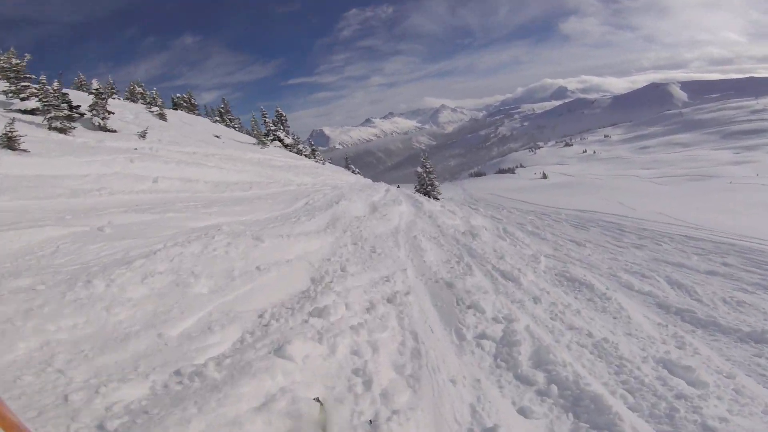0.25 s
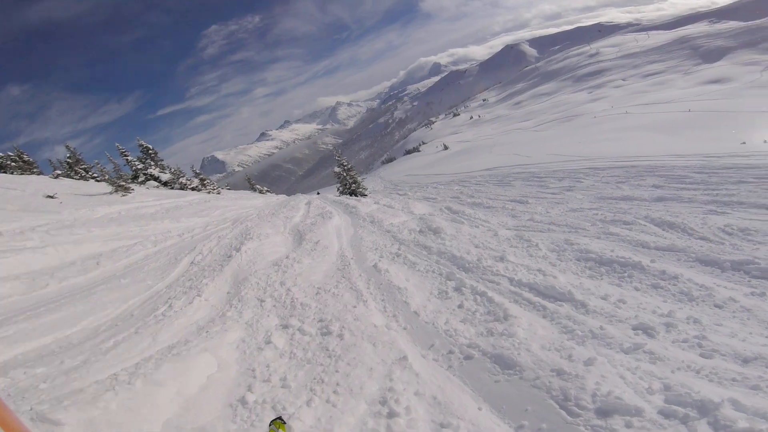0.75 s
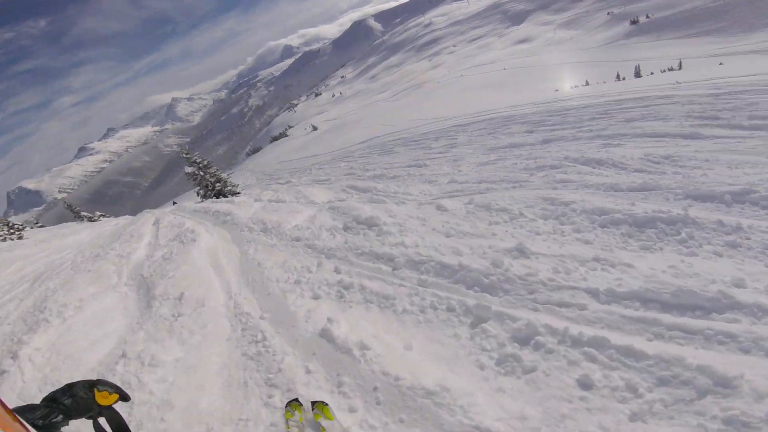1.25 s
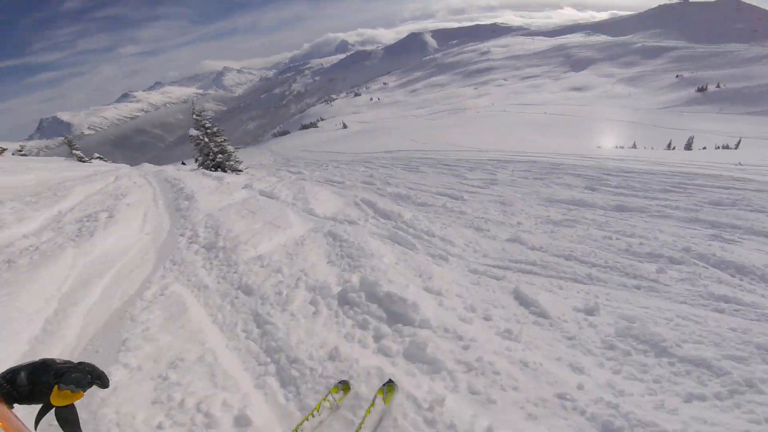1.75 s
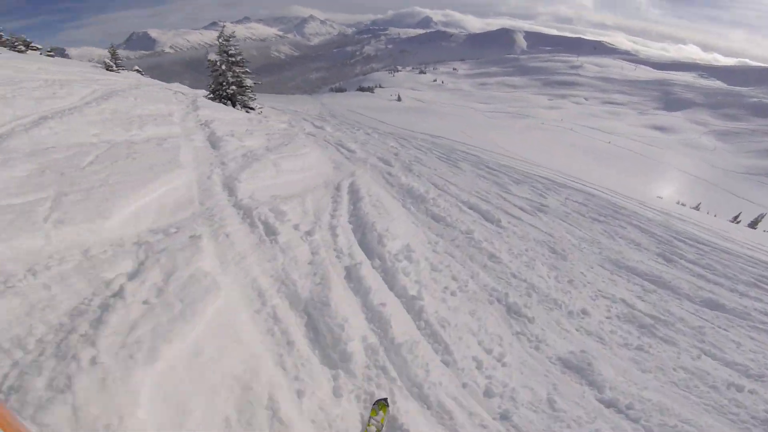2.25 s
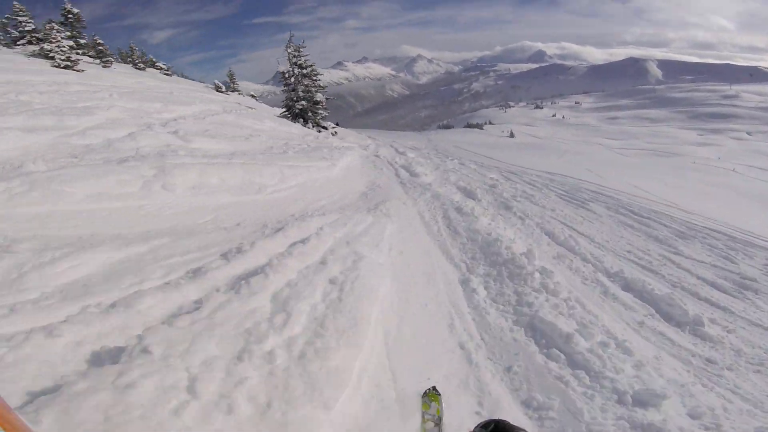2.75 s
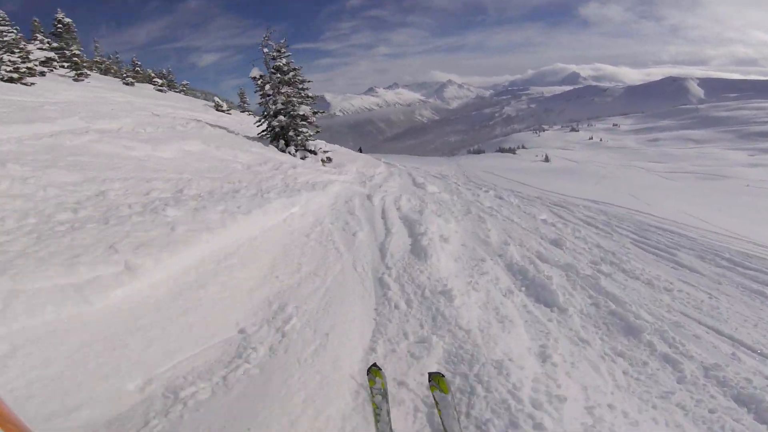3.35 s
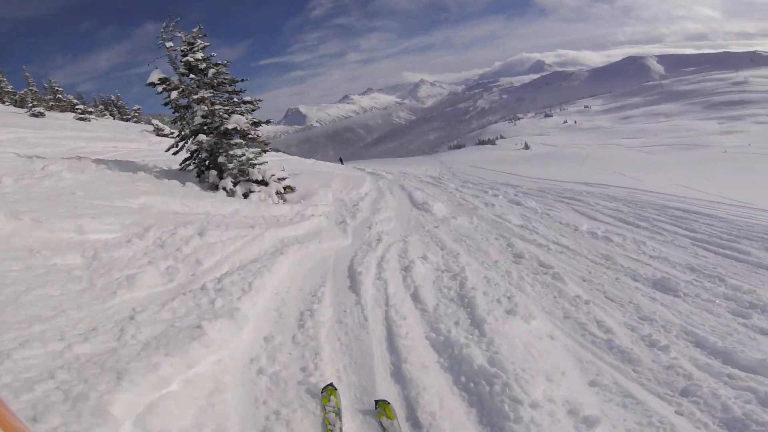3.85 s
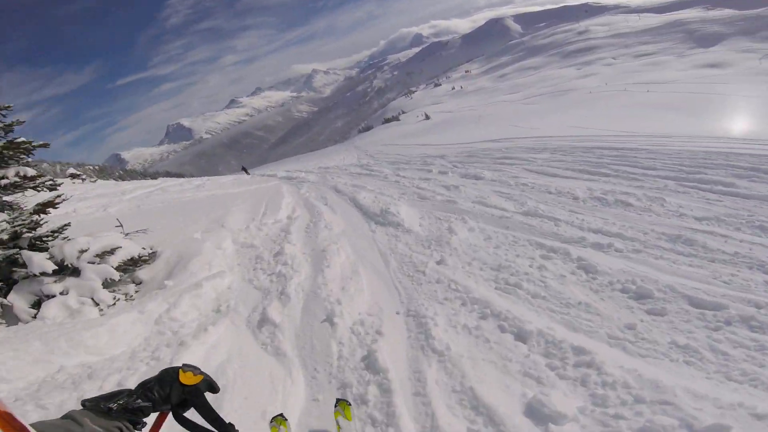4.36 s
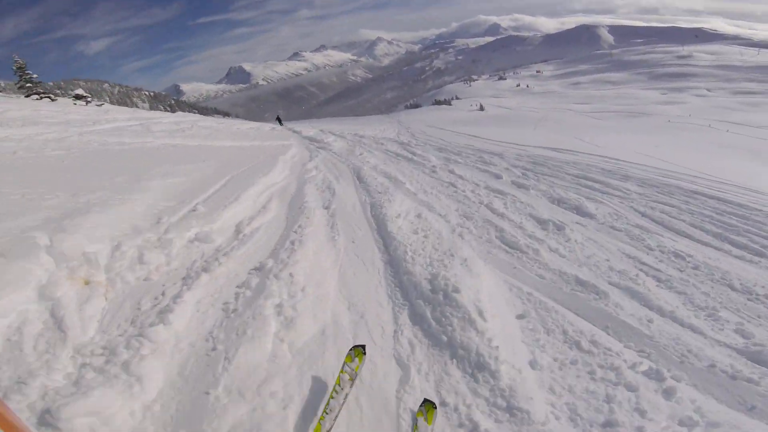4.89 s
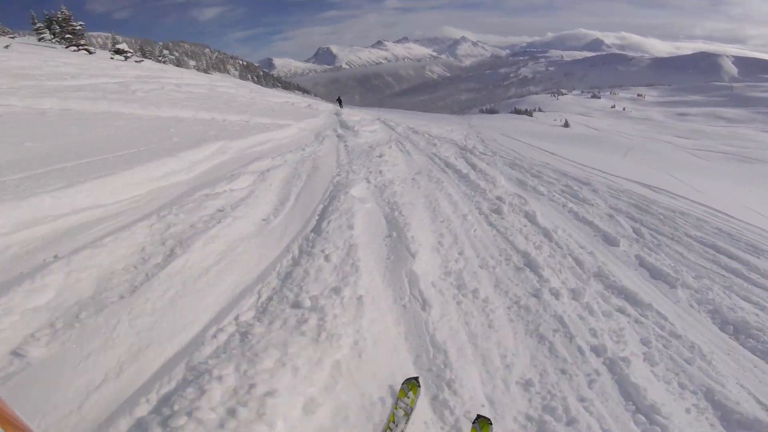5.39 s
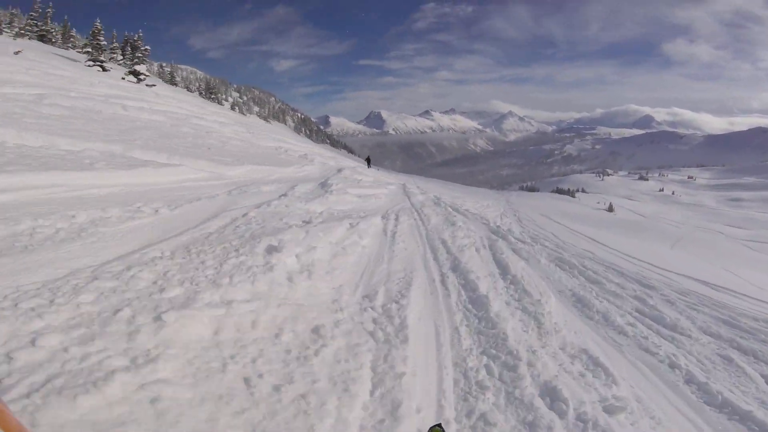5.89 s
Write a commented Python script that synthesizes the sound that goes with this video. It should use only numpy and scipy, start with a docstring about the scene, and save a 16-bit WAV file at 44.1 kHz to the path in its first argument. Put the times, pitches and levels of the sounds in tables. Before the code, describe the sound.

Low, gusty wind buffets the microphone of a camera worn by a skier on an open mountain slope. It starts light and grows with speed, fluttering and thumping unevenly. Underneath, the skis hiss through chopped powder, swelling into a soft, crunchy roar with each skid. A few faint gear squeaks and small ticks of snow come through. The wind is strongest near the end.

```python
"""Low, gusty wind thumps on a body-worn camera over the hiss of a skier gathering speed in powder.
Swirls of air buffet the microphone and break into a finer rush, all growing with airspeed.
The skis hiss and plough through the chopped snow, louder in each skid; the camera's housing
colours the hiss. The gear squeaks now and then, and bits of snow tick against it."""
import sys
import numpy as np
from scipy import signal
from scipy.fft import rfft, irfft
from scipy.io import wavfile
from scipy.ndimage import uniform_filter1d

SR = 44100
rng = np.random.default_rng(int(sys.argv[2]) if len(sys.argv) > 2 else 0)


def log_audio(samples):
    """Write samples as a 16-bit WAV file to the path given in sys.argv[1]."""
    # one column per channel
    frames = np.atleast_2d(samples).T
    # limit to full scale, then quantise
    limited = np.clip(frames, -1, 1)
    pcm = np.round(limited * 32767).astype(np.int16)
    wavfile.write(sys.argv[1], SR, pcm)


N = 270333
T = np.arange(N) / SR

# How strong each noise is from bass to treble: frequency_hz, level_db
BACKGROUND_COLOUR = [(100, 10), (700, 10), (2000, 3), (4000, -10), (8000, -3.5), (11000, -9.5), (13000, -8),
                     (15000, -32)]
SNOW_HISS_COLOUR = [(400, 1), (1200, -6.5), (2000, -0.5), (2900, -3), (4100, -9.5), (5500, -3.5),
                    (7500, 0.5), (9500, -5.5), (10800, -20), (13000, -28), (15000, -38)]
SNOW_ROAR_COLOUR = [(150, -3), (350, 4.5), (550, 2), (850, -2), (1400, -10), (2100, -18.5), (3000, -24.5),
                    (4200, -34), (9000, -80)]
WIND_BUFFET_COLOUR = [(10, -29), (22, 5.5), (38, 6.5), (60, 8), (95, 1.5), (135, -8.5), (200, -23.5),
                      (400, -45)]
WIND_FLUTTER_COLOUR = [(60, -46), (100, 1.5), (135, -1), (200, -7), (300, -13.5), (450, -23.5), (800, -40),
                       (2000, -72.5)]
WIND_RUSH_COLOUR = [(150, -8), (350, 4.5), (550, 2), (850, -6), (1400, -12.5), (2100, -19.5), (3000, -22),
                    (4200, -27.5), (9000, -78)]
# Where the air in the camera's housing rings: pitch_hz, width_hz, boost_db
HOUSING_RINGS = [(5350, 960, 8.5), (6510, 390, 12)]
# Snow crumbs and knocks on the gear: start_s, level_db, lowest_hz, highest_hz
GEAR_TICKS = [(.572, -43, 3000, 7300), (1.656, -40, 2380, 6900), (2.138, -46, 1200, 4896),
              (2.35, -44, 1800, 4000), (3.4634, -35.5, 1150, 3850), (4.742, -39, 1000, 3200),
              (5.968, -42, 1200, 3500), (6.0152, -26, 420, 2000)]
# Rubbing gear: start_s, length_s, start_pitch_hz, end_pitch_hz, level_db, pitch_wobble_share
GEAR_SQUEAKS = [(3.33, 0.058, 1710, 1763, -48.5, 0.019), (4.336, .081, 820, 966, -47.5, .08),
                (4.388, 0.092, 1450, 1330, -56, 0.039), (4.56, 0.043, 1130, 1224, -49, .035),
                (5.035, .018, 1640, 1790, -55, .04), (5.224, 0.061, 1580, 2000, -51, 0.033)]
# Hiss of running straight, fainter when the skis lighten: time_s, level_db
GLIDE_HISS = [(0, -56), (.8, -59.5), (1.65, -56.5), (2.27, -60.5), (2.5, -50), (3.95, -61.5), (4.05, -57.5),
              (4.45, -60), (4.9, -61.5), (5.2, -52), (5.9, -57.5), (6.13, -56.5)]
# An edge bites and throws snow: start_s, hold_s, hiss_db, roar_db
EDGE_SKIDS = [(0.54, 0.031, -55, -80), (1.242, 0.037, -60, -52), (1.712, 0.11, -53.5, -49),
              (2.09, 0.064, -68, -44.5), (2.359, 0.36, -56.5, -36), (2.802, 0.092, -45, -50),
              (2.96, .15, -51.5, -54), (3.22, .12, -50.5, -49), (3.663, 0.15, -55.5, -62),
              (4.576, .15, -51.5, -45.5), (4.75, 0.03, -73, -40.5), (5.022, 0.1, -70, -40.5),
              (5.09, 0.22, -52.5, -43), (5.355, .07, -57, -63), (5.5, 0.082, -52.5, -49),
              (5.606, 0.087, -49.5, -38.5), (5.935, 0.25, -73, -35)]
# Air streaming past the camera: time_s, share_of_cruising_speed
AIR_SPEEDS = [(0, 0.44), (.45, 0.56), (.78, 0.5), (1.05, 0.79), (1.45, 0.84), (2.2, 1.012), (2.6, 1.196),
              (3.35, 1.175), (3.8, .89), (4.25, 0.92), (4.45, 1.076), (4.92, 0.86), (5.1, 1.11),
              (5.6, 0.96), (5.72, 1.33), (6.13, 1.37)]
# Single hard swirls of air: start_s, length_s, pitch_hz, level_db
HARD_SWIRLS = [(.96, .018, 110, -26), (1.343, 0.021, 127, -25), (1.379, 0.014, 150, -20),
               (1.501, 0.016, 230, -42), (1.928, 0.021, 130, -22.5), (2.755, 0.025, 112, -16.5),
               (3.044, 0.017, 130, -18.5), (3.591, 0.039, 97, -16.5), (5.071, 0.018, 139, -22),
               (5.342, 0.022, 129, -20), (5.488, .02, 157, -24), (5.740, 0.032, 139, -13.5),
               (5.888, 0.027, 152.7, -15.5)]
# Brief gusts and lulls: middle_s, length_s, buffet_change_db, flutter_change_db
GUSTS_AND_LULLS = [(0.26, 0.14, -9, 3), (0.717, 0.097, 6, 0.5), (0.864, 0.034, 11, -2),
                   (0.933, 0.1, -4, -8), (1.111, 0.1, 7, 2.5), (1.205, .12, -8, -9), (1.564, 0.24, 5, 1.5),
                   (1.682, 0.04, -11, -3), (1.94, 0.056, 7, 0.5), (1.99, 0.1, -1, -5.5),
                   (2.157, 0.053, 7, 1), (2.786, 0.057, 4.5, 6.5), (2.876, 0.25, -4.5, -8.5),
                   (3.18, 0.17, -4, -6), (3.36, 0.23, 3.5, 2), (3.5, 0.2, -9, -8), (3.629, .11, 8.5, 8.5),
                   (3.717, 0.14, -5.5, -4), (3.998, 0.091, -7, -5.5), (4.178, 0.049, -8, -9.5),
                   (4.493, 0.05, 7, 1.5), (5.662, 0.053, 10, 3.5), (5.73, 0.07, 6.5, 7),
                   (5.825, 0.088, 6, -1), (6.11, 0.074, -8, 2.5)]

BACKGROUND_DB, WHINE_HZ, WHINE_DB = -62, 877, -75
SKID_ATTACK_S, SKID_RELEASE_S = 0.039, 0.086
ROAR_BUILD_S, ROAR_SAG_DB_PER_S = 0.042, 10.5
SLOW_PLOUGH_DB, PLOUGH_DB = -60, -48
UP_TO_SPEED_S, PLOUGH_RISE_DB_PER_S = 2.12, 23
BUFFET_DB, FLUTTER_DB, RUSH_DB = -28, -32, -59  # at cruising speed, before gusts
BUFFET_POWER, FLUTTER_POWER, RUSH_POWER = 1.8, 3, 5.9  # how steeply each grows with airspeed
RUSH_GUST_SHARE = 0.73  # how far the rush follows the flutter in a gust


def undb(db):
    """Turn decibels into a number to multiply by."""
    return 10 ** (np.asarray(db) / 20)


def unit(x):
    """Scale a signal to an average strength (rms) of 1."""
    return x / np.sqrt(np.mean(x ** 2) + 1e-18)


def curve(table):
    """Join (time, value) points with straight lines."""
    return np.interp(T, *np.transpose(table))


def colour(x, points):
    """Shape a sound's bass and treble, falling steeply above the last point."""
    hz, db = np.transpose(points)
    f = np.maximum(np.fft.rfftfreq(len(x), 1 / SR), 1)
    gain = undb(np.interp(np.log(f), np.log(hz), db)) * np.minimum(hz[-1] / f, 1) ** 2
    return irfft(rfft(x) * gain, len(x))


def wander(rate_hz):
    """A smooth random drift with a typical size of 1."""
    f = np.fft.rfftfreq(N, 1 / SR)
    return unit(irfft(rfft(rng.standard_normal(N)) / (1 + (f / rate_hz) ** 2), N))


def steady(x, span_s):
    """Even out a signal's slow swells and keep its fast ones."""
    size = max(int(span_s * SR), 2)
    local_power = uniform_filter1d(uniform_filter1d(x ** 2, size), size)
    return x / np.sqrt(local_power + 1e-12)


def impacts(per_second, spread_db):
    """Tiny pushes and pulls of uneven size at random times."""
    chance, size = rng.random(N), rng.standard_normal(N)
    return (chance < per_second / SR) * rng.choice([-1, 1], N) * undb(spread_db * np.clip(size, -2, 2))


def housing(x):
    """The hollow in front of the microphone rings in the treble."""
    f = np.maximum(np.fft.rfftfreq(N, 1 / SR), 1)
    ringing = sum(undb(db) ** 2 / (1 + (2 * (f - hz) / width) ** 2) ** 1.5
                  for hz, width, db in HOUSING_RINGS)
    return irfft(rfft(x) * np.sqrt(1 + ringing), N)


def swell(start, length):
    """A rounded rise and fall in loudness."""
    return np.sqrt(np.maximum(np.sin(np.pi * np.clip((T - start) / length, 0, 1)), 0))


def background():
    """A faint, even hiss and a fainter steady whine."""
    hiss = unit(colour(rng.standard_normal(N), BACKGROUND_COLOUR)) * undb(BACKGROUND_DB)
    whine = undb(WHINE_DB) * np.sqrt(2) * np.sin(2 * np.pi * WHINE_HZ * T)
    return hiss + whine


def ticks(size=2048, die_away_s=0.008):
    """Small blows on the gear each make a quick crack; heavier ones are duller."""
    out, age = np.zeros(N + size), np.arange(size) / SR
    fade = np.exp(-np.log(1000) * age / die_away_s)
    for start, db, low_hz, high_hz in GEAR_TICKS:
        band = signal.butter(3, [low_hz, high_hz], btype="band", fs=SR, output="sos")
        crack = signal.sosfilt(band, rng.standard_normal(size) * fade)
        at = int(start * SR)
        out[at:at + size] += undb(db) * crack / np.abs(crack).max()
    return out[:N]


def squeaks(octave_db=-15, rough_db=4):
    """Gear sticks and slips, making a shaky, sliding tone with a weak octave above it."""
    out, waver, grip = np.zeros(N), wander(190), undb(rough_db * wander(100))
    for start, length, start_hz, end_hz, db, wobble in GEAR_SQUEAKS:
        hz = np.interp(T, [start, start + length], [start_hz, end_hz]) * (1 + wobble * waver)
        phase = 2 * np.pi * np.cumsum(hz) / SR
        tone = np.sqrt(2) * (np.sin(phase) + undb(octave_db) * np.sin(2 * phase))
        out += undb(db) * swell(start, length) * grip * tone
    return out


def skid(start, hold):
    """How hard a ski's edge digs in: it bites, holds, then lets go."""
    bite = np.clip((T - start) / SKID_ATTACK_S + .5, 0, 1)
    return bite * np.exp(-np.maximum(T - start - hold, 0) / SKID_RELEASE_S)


def skis():
    """Snow crystals break with a patchy hiss and ploughed snow roars. Skids add to both."""
    grains = unit(impacts(6500, 4.7)) + 0.77 * rng.standard_normal(N)
    lumps = undb(1.15 * wander(35))
    hiss = unit(housing(colour(grains * lumps, SNOW_HISS_COLOUR)))
    roar = unit(colour(impacts(8000, 3.4) * undb(1.45 * wander(52)), SNOW_ROAR_COLOUR))
    hiss_power = undb(curve(GLIDE_HISS)) ** 2
    plough_db = PLOUGH_DB - PLOUGH_RISE_DB_PER_S * np.maximum(UP_TO_SPEED_S - T, 0)
    roar_power = undb(SLOW_PLOUGH_DB) ** 2 + undb(plough_db) ** 2
    for start, hold, hiss_db, roar_db in EDGE_SKIDS:
        edge, age = skid(start, hold), np.maximum(T - start, 0)
        # Snow takes a moment to heap up in front of the edge.
        heap = (1 - np.exp(-age / ROAR_BUILD_S)) * undb(roar_db - ROAR_SAG_DB_PER_S * age)
        hiss_power += (edge * undb(hiss_db)) ** 2
        roar_power += (edge * heap) ** 2
    return hiss * np.sqrt(hiss_power) + roar * np.sqrt(roar_power)


def hard_swirls():
    """A strong swirl of air rocks the pressure back and forth a few times: a thump."""
    out = np.zeros(N)
    uneven_time = np.cumsum(np.exp(0.32 * wander(66))) / SR
    for start, length, hz, db in HARD_SWIRLS:
        phase = 2 * np.pi * hz * (uneven_time - np.interp(start, T, uneven_time))
        out += undb(db) * swell(start, length) ** 2 * np.sqrt(2) * np.sin(phase)
    return out


def gusts():
    """How many decibels gusts and lulls add to or take from the buffet and the flutter."""
    swells = [swell(middle - length / 2, length) ** 2 for middle, length, _, _ in GUSTS_AND_LULLS]
    changes_db = np.array(GUSTS_AND_LULLS)[:, 2:]
    return changes_db.T @ np.array(swells)


def wind():
    """Big swirls push on the microphone, small ones flutter on their crests, and both shed a rush."""
    speed = curve(AIR_SPEEDS)
    buffet_gust_db, flutter_gust_db = gusts()
    big = steady(colour(impacts(300, 3.06), WIND_BUFFET_COLOUR), span_s=0.076)
    crests = undb(2.57 * np.clip(big, -2, 2))
    small = steady(colour(impacts(500, 5.8) * crests, WIND_FLUTTER_COLOUR), span_s=0.051)
    shedding = 1 + 0.4 * np.abs(big) + 0.14 * np.abs(small)
    fine = unit(colour(impacts(8000, 1.2) * shedding, WIND_RUSH_COLOUR))
    buffet = big * undb(BUFFET_DB + buffet_gust_db + 2.06 * wander(25)) * speed ** BUFFET_POWER
    flutter = small * undb(FLUTTER_DB + flutter_gust_db) * speed ** FLUTTER_POWER
    rush = fine * undb(RUSH_DB + RUSH_GUST_SHARE * flutter_gust_db) * speed ** RUSH_POWER
    return buffet + flutter + rush


def scene():
    """Wind, snow and gear over the faint background, in one channel."""
    return (background() + wind() + hard_swirls() + skis() + squeaks() + housing(ticks()))[None, :]


def record(dry):
    """The camera cuts the highest treble; both ends fade softly."""
    top_hz, fade_s = 13600, 0.004
    fade = np.clip(np.minimum(T, T[-1] - T) / fade_s, 0, 1)
    return signal.sosfilt(signal.ellip(8, .2, 80, top_hz, fs=SR, output="sos"), dry * fade)


dry = scene()
out = record(dry)
log_audio(out)
```